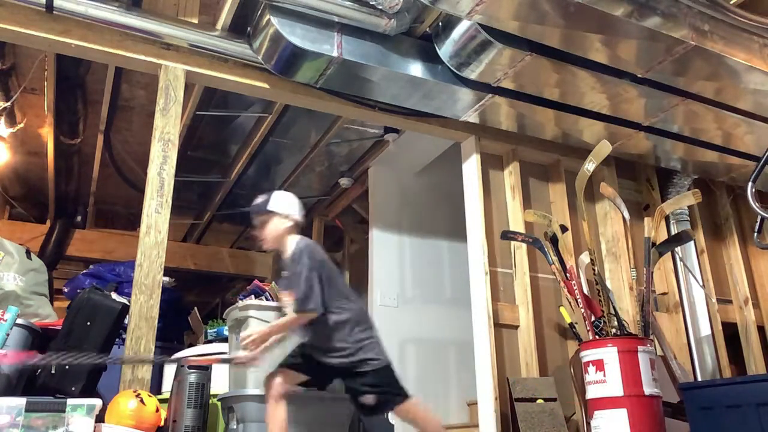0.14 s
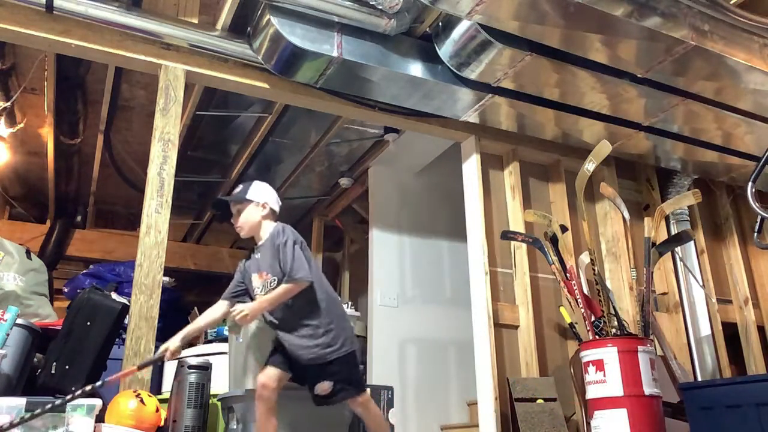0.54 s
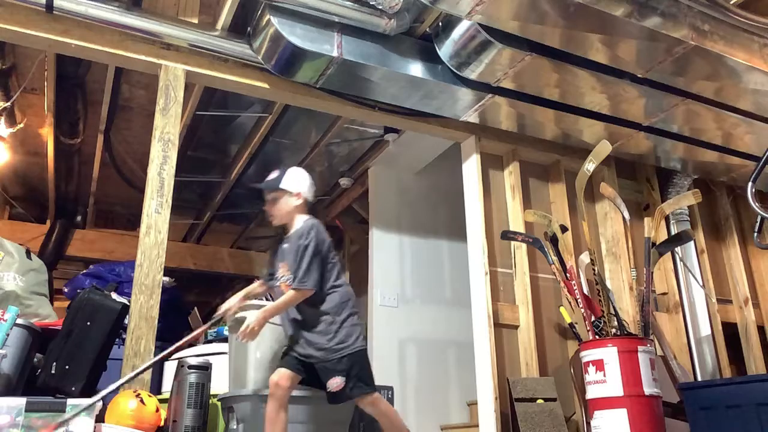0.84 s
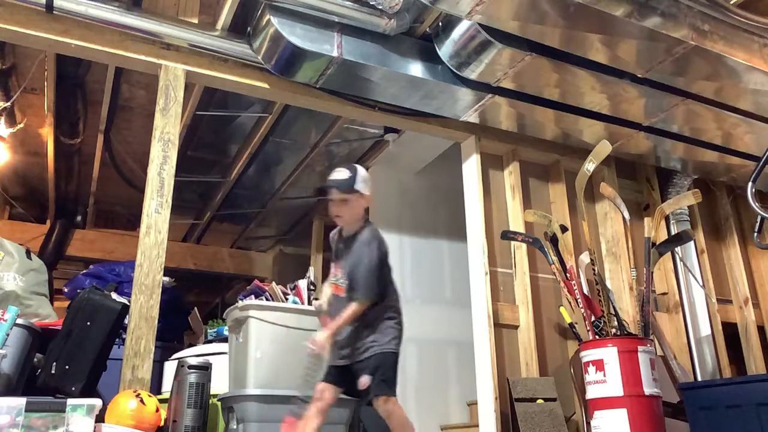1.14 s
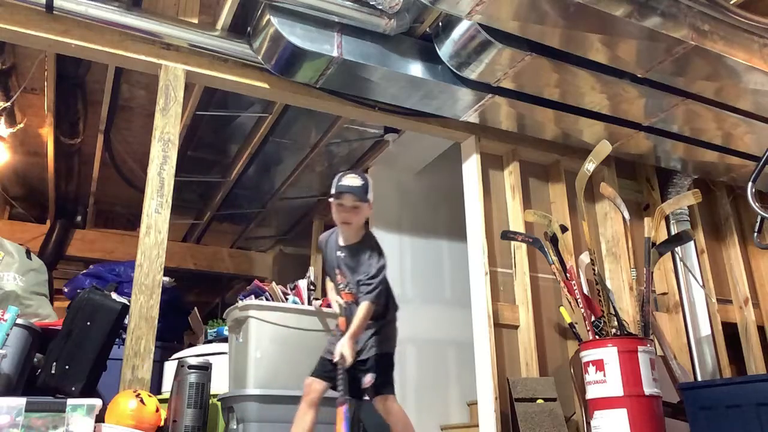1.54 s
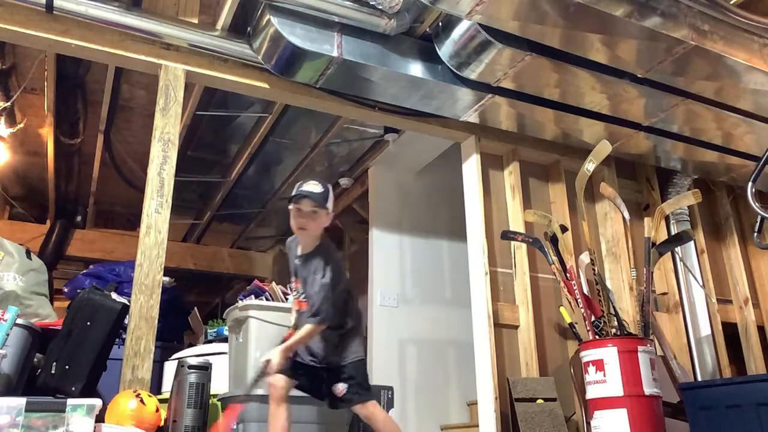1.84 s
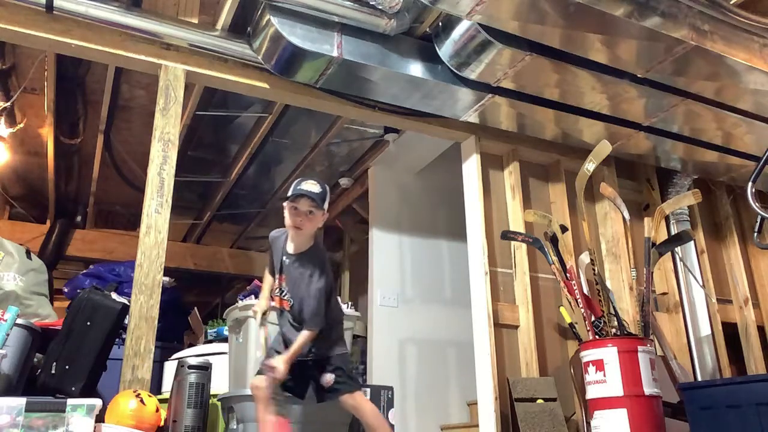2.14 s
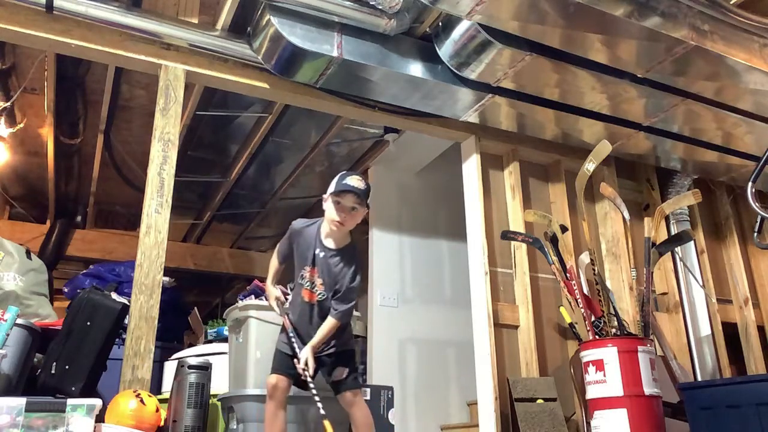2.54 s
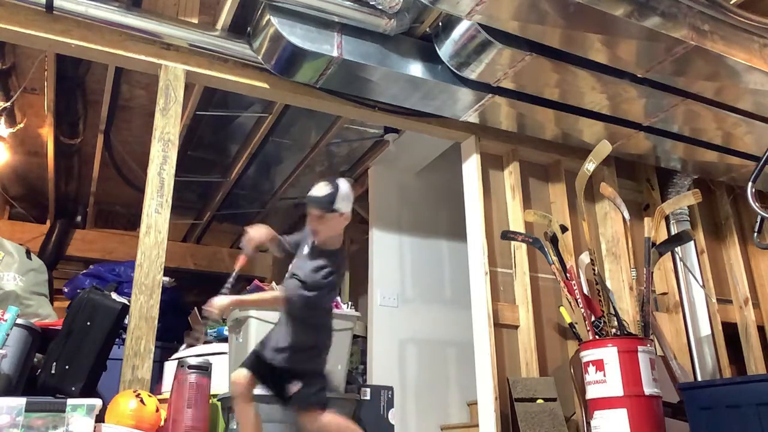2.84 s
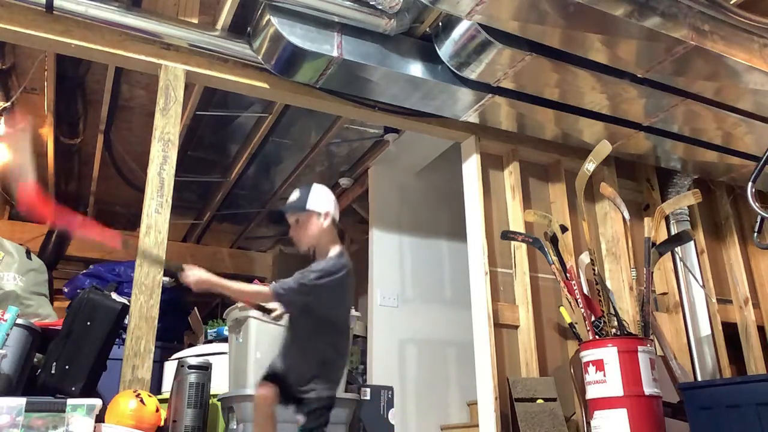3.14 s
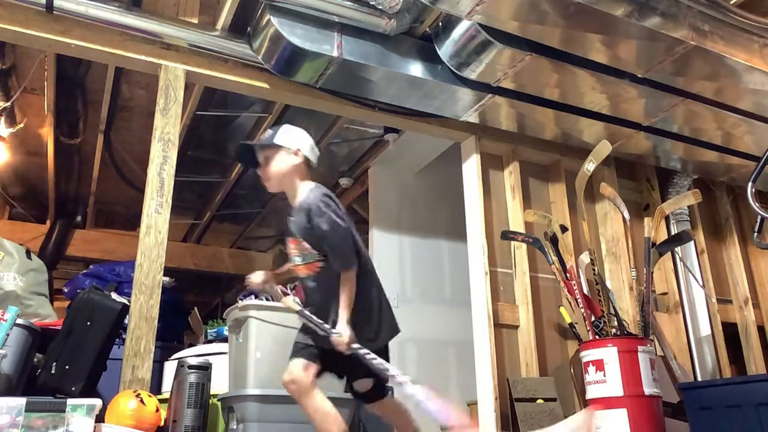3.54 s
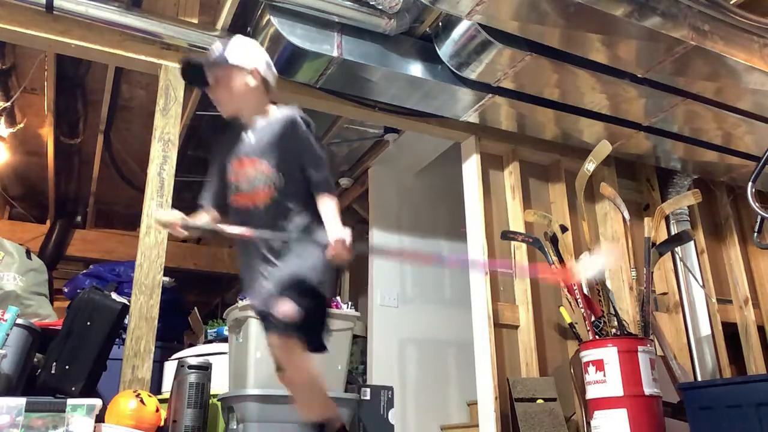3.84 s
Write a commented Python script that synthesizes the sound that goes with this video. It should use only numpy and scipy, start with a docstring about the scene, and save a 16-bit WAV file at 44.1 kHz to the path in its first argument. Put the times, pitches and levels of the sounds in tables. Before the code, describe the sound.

Hockey stick blade knocks a puck on a hard garage floor, then a shot crashes into metal

```python
"""Stick and puck in a bare garage

A child handles a puck with a hockey stick on a hard floor: the blade clacks as clicks with noisy chatter and ringing modes.
Gritty noise scrapes between touches and sweeps into a shot, whose noise crashes ring and rattle metal modes.
Low noise bursts are the thuds of feet, shaped noise and a sine are the air and its faint hum.
A muffled direct path and a dense random tail give reverberation to all but the background, which stays dry."""
import sys
import numpy as np
from scipy import signal
from scipy.io import wavfile
from scipy.ndimage import uniform_filter1d

SR = 44100
rng = np.random.default_rng(int(sys.argv[2]) if len(sys.argv) > 2 else 0)


def unload_audio(sound):
    """Save the sound as a 16-bit wav file, at the path given as the first command line argument."""
    columns = np.transpose(np.atleast_2d(sound))
    # keep every value between -1 and 1, then stretch to whole-number steps
    steps = np.round(np.clip(columns, -1, 1) * 32767)
    wavfile.write(sys.argv[1], SR, steps.astype(np.int16))


N = 176400


def amp(db):
    """Decibels to gain."""
    return 10 ** (np.asarray(db) / 20)


def unit(x):
    """Scales a sound to energy 1."""
    return x / np.sqrt(np.sum(x ** 2) + 1e-20)


def read(points, hz):
    """Reads a (Hz, value) table on a log-frequency axis."""
    f, value = np.transpose(points)
    return np.interp(np.log(hz + 1), np.log(f), value)


def add(mix, s, sound):
    """Mixes a sound in at a time in seconds, cut at the end of the mix."""
    part = mix[max(round(s * SR), 0):][:len(sound)]
    part += sound[:len(part)]


def colour(x, *tables, size=4096):
    """Minimum-phase filter from the sum of (Hz, dB) tables, so that no sound precedes its cause."""
    hz = abs(np.fft.fftfreq(size, 1 / SR))
    total_db = sum(read(table, hz) for table in tables)
    log_gain = np.log(amp(total_db))
    spectrum = np.exp(np.conj(signal.hilbert(log_gain)))
    taps = np.fft.ifft(spectrum).real[:size // 2]
    return signal.fftconvolve(x, taps)[:len(x)]


def ring(modes, t):
    """Resonant modes as dying sines of random phase, each with the energy of its dB value."""
    out = np.zeros(len(t))
    for hz, db, t60_s in modes:
        u = t[t < t60_s]
        decay = np.exp(-np.log(1000) * u / t60_s)
        tone = np.sin(2 * np.pi * (hz * u + rng.random()))
        add(out, 0, amp(db) * unit(decay * tone))
    return out


def room(x, room_db=0):
    """Muffled straight path, a cluster of ceiling reflections and a random tail that dies band by band."""
    # reverberation time: frequency_hz, t60_s
    reverb_t60 = [(100, 0.5), (260, 1.1), (700, 1.34), (1840, 0.98), (4850, 0.8738), (7000, 0.7248),
                  (10000, 0.6), (15000, .3)]
    # muffling of the straight path: frequency_hz, gain_db
    direct_colour = [(100, -11.5), (1000, -2), (3000, -5.5), (6000, -11), (9000, -13), (16000, -27)]
    base_db, near_db, near_decay_s = -0.5, 7.5, 0.071
    early_db, early_s, early_width_s = 9, 0.015, 0.0029
    reflections_per_s, onset_s = 5000, 0.0028
    t = np.arange(SR * 3 // 4) / SR
    # every call draws new reflections
    taps = rng.choice([-1., 1.], len(t)) * (rng.random(len(t)) < reflections_per_s / SR)
    near = amp(near_db) * np.exp(-t / near_decay_s)
    early = amp(early_db) * np.exp(-((t - early_s) / early_width_s) ** 2)
    taps *= np.minimum(t / onset_s, 1) * (1 + near + early)
    # the decay is applied to each band of the spectrogram
    hz, at_s, z = signal.stft(taps, SR, nperseg=256)
    decay = amp(-60 * at_s / read(reverb_t60, hz)[:, None])
    tail = signal.istft(z * decay, SR, nperseg=256)[1]
    reflected = signal.fftconvolve(x, unit(tail))[:len(x)]
    return colour(x, direct_colour) + amp(base_db + room_db) * reflected


def background():
    """Still room air as steady coloured noise, with a faint mains hum as one sine."""
    # spectrum of the air, relative: frequency_hz, density_db (per Hz)
    air_colour = [(15, -56), (25, -68), (55, -1), (120, -8.5), (190, -6.5), (263, -5.5), (451, -12.5),
                  (531, -11), (1370, -25.5), (3250, -24.5), (3620, -25.5), (6560, -18), (16000, -50)]
    air_db, hum_db, hum_hz = -52, -59.5, 120  # RMS levels
    air = unit(colour(rng.standard_normal(N), air_colour)) * np.sqrt(N)
    hum = np.sqrt(2) * np.sin(2 * np.pi * hum_hz * np.arange(N) / SR)
    return amp(air_db) * air + amp(hum_db) * hum


def thumps():
    """Footfalls and dull thumps: soft, low blows on the floor as short decaying noise."""
    # blows: start_s, relative_level_db
    blows = [(0.023, 3), (.055, -8), (3.041, -1), (3.225, 8), (3.317, -20), (3.482, 9.5), (3.556, 5),
             (3.6, -4), (3.709, 2.5)]
    # dull spectrum of a blow: frequency_hz, gain_db
    thump_colour = [(30, -25), (60, 2), (160, -0.5), (300, -15), (700, -34), (2000, -35), (16000, -63)]
    base_db, decay_s = 3.5, 0.01
    out, t = np.zeros(N), np.arange(SR // 4) / SR
    for s, db in blows:
        burst = unit(rng.standard_normal(len(t)) * np.exp(-t / decay_s))
        add(out, s, amp(base_db + db) * colour(burst, thump_colour))
    return out


def scrapes():
    """Blade and shoes drag over the floor: dense grit under a stroke that swells and lifts off."""
    # strokes: start_s, rise_s, release_s, level_db, body_db (tilts low mids against treble)
    strokes = [(.06, 0.11, 0.13, -46, -8.5), (0.581, 0.03, 0.063, -43, 0), (.65, 0.043, 0.18, -35, 0.5),
               (.79, 0.033, 0.082, -40, -6), (.97, 0.019, 0.41, -49, -5), (1.561, 0.17, 0.049, -34, -1.5),
               (2.531, 0.13, 0.26, -36, -4), (2.77, 0.068, 0.05, -27.5, -3.5),
               (2.86, 0.054, 0.048, -37, -3), (3.196, 0.029, 0.011, -21.5, 5.5),
               (3.39, 0.096, 0.12, -34.5, 7), (3.85, 0.061, 0.38, -45.5, -9.5)]
    # spectrum of the grit: frequency_hz, gain_db
    scrape_colour = [(60, -38), (250, -6), (600, -5), (1200, -8.5), (2500, -3.5), (5000, -1.5), (6800, 4),
                     (8000, -2), (10500, -10.5), (16000, -18)]
    grains_per_s, grain_db = 1200, 5
    out = np.zeros(N)
    for s, rise_s, release_s, db, body_db in strokes:
        t = np.arange(0, rise_s + release_s, 1 / SR)
        sign, size, chance = rng.standard_normal(SR), rng.exponential(1, SR), rng.random(SR)
        # sparse larger grains stand out of fine noise
        grains = amp(grain_db * np.minimum(size, 4)) * (chance < grains_per_s / SR)
        grit = sign * (.5 + grains)
        tilt = [(1500, body_db), (6500, 0), (12000, -.9 * body_db)]
        hiss = unit(colour(grit, scrape_colour, tilt)) * np.sqrt(SR)
        swell = np.interp(t, [0, rise_s, rise_s + release_s], [0, 1, 0])
        stroke = np.sin(np.pi / 2 * swell) ** 2
        add(out, s, amp(db) * stroke * hiss[:len(t)])
    return out


def shot():
    """The puck crashes into metal as noise bursts; the metal's modes ring on and rattle."""
    # two crashes in quick succession: start_s, relative_level_db
    crashes = [(3.2162, 3), (3.2285, -8.5)]
    # spectrum of a crash: frequency_hz, gain_db
    crash_colour = [(40, -13), (110, -12), (210, 1), (330, -31), (500, -13), (1100, -14.5), (2400, -4.5),
                    (4500, -4.5), (6400, 8), (7500, 1), (9000, -10), (16000, -24)]
    # modes of the struck metal: frequency_hz, relative_level_db, t60_s
    metal_modes = [(2261, 6, 0.52), (2455, 6, 0.3), (3440, -2.5, 0.35), (4850, -21, 0.28), (5650, -12, .3),
                   (6100, 10, 0.18), (6100, 5, 0.38), (6345, 2, .7), (6700, 7, 0.36), (6717, 4, 0.46),
                   (6960, 1, .4), (7376, 1, .4)]
    crash_db, rise_s, decay_s, crash_room_db = 26.5, 0.0041, 0.003, -3.5
    metal_db, metal_room_db = 13.5, -11
    # the shaking peaks at a time in the scene
    shake_s, shake_width_s, shakes_per_s, shake_db = 3.45, 0.084, 150, 5
    out, t = np.zeros(N), np.arange(SR) / SR
    for s, db in crashes:
        crash = rng.standard_normal(SR) * np.minimum(t / rise_s, 1) ** 2 * np.exp(-t / decay_s)
        add(out, s, amp(crash_db + db) * room(colour(unit(crash), crash_colour), crash_room_db))
    struck_s = crashes[0][0] + rise_s
    metal = unit(ring(metal_modes, t))
    # small random blows, strongest around shake_s, excite the same modes again
    blows = rng.standard_normal(SR) * (rng.random(SR) < shakes_per_s / SR)
    rattle = blows * np.exp(-((t + struck_s - shake_s) / shake_width_s) ** 2)
    shaken = signal.fftconvolve(rattle, metal)[:SR]
    add(out, struck_s, room(amp(metal_db) * metal + amp(shake_db) * unit(shaken), metal_room_db))
    return out


def knocks():
    """Click, chatter and blade modes favoured near each blow's ring centre; reflections drawn at random."""
    # touches, levels relative: start_s, level_db, chatter_decay_s, bass_db, body_db, treble_db,
    # blade_ring_db, ring_centre_hz, room_db
    touches = [(0.4038, -8, 0.0049, 8, 2.5, -2.5, 2.5, 1870, 1.5),
               (0.4128, -4, 0.0025, -6, -2, -8.5, 0, 4530, 0),
               (.7180, -11.5, 0.0055, 12, 11, -3.5, 3, 1780, -1),
               (0.735, -16, 0.0016, -8, 9, 0, 3, 1680, -6), (.7440, -19, 0.0014, 12, 4, 2, -20, 1700, -3.5),
               (0.8263, -14.5, 0.00079, 1, 0.5, -14.5, -28, 1700, 1),
               (.8500, -20, 0.0028, 17, 8, 1, -16, 1700, -6),
               (0.8943, -24.5, 0.001, -6, -24, 5.5, -23, 2980, -8),
               (.9095, -25, .004, 0, -15, 17.5, 1, 2900, -9.5),
               (1.008, -39, 0.0042, -29, -4, 23, -33, 2900, -14),
               (1.064, -25.5, .0015, 10, -15, -7, -10, 2950, -1),
               (1.0765, -26, 0.0019, -7, -6, 3, 3, 2930, -8.5), (1.19, 2, 0.0055, -2.5, 1, 0, -5, 2380, -4),
               (1.2040, -3.5, 0.0016, -4, -10, 2, -2, 2800, 0),
               (1.7554, -11.5, 0.00054, 12, 8.5, 4, -5, 3000, -3),
               (1.9948, 2.5, 0.015, 1, 9, 3, -4, 2420, -8.5),
               (2.0120, 0, 0.0029, -5, -14, 2.5, -2, 6650, -7),
               (2.0451, -12.5, 0.00021, 5, -12, 4, -19, 4000, -3),
               (2.0580, -16.5, 0.0028, 19, 16, 24.5, 5, 5800, -33),
               (2.0630, -15, 0.004, 19.5, -12, 22.5, 12.5, 6250, -16.5),
               (2.2231, -10.5, 0.0023, 19, -4, 9.5, -1.5, 2840, 1.5),
               (2.2256, 2, 0.0056, 9, 2.5, -0.5, -33, 3350, -2.5),
               (2.7440, -26, 0.0013, 8, 10, -0.5, -9, 2970, 2.5),
               (3.167, -31.5, 0.0037, 13, 14, 1, -5, 2000, 1.5),
               (3.1790, -27.5, 0.004, 17.5, -5, 6, 4, 1930, 0.5),
               (3.6650, -29, .002, 8, 0, 3.5, -15, 2500, 0), (3.6731, -25, 0.0016, 5, 2, -24, -15, 2620, 2),
               (3.8735, -34.5, 0.0014, 0, 9.5, -15, -14, 2530, 5.5),
               (3.889, -39.5, 0.0024, 23, -8, 11.5, -11, 2500, -11)]
    # spectrum of a knock: frequency_hz, gain_db
    knock_colour = [(50, -49), (140, -11.5), (300, -11.5), (700, -9), (1100, -8.5), (1700, -1.5),
                    (2800, -0.5), (4500, -3), (6800, 0), (8500, -10.5), (11000, -17.5), (16000, -31)]
    # modes of the blade: frequency_hz, relative_level_db, t60_s
    blade_modes = [(1280, -4.5, 0.17), (1596, -2.5, 0.059), (1760, -5.5, 0.023), (2066, -2, 0.12),
                   (2538, -1.5, 0.059), (2830, -14, 0.19), (2960, -5, .12), (3660, -11, 0.042),
                   (4060, -3.5, 0.074), (4506, -4, 0.02), (5750, 0, 0.1), (6520, 4, 0.02),
                   (6730, -16, 0.066)]
    base_db, ring_base_db, ring_width_octaves = 25.5, -10, 0.26
    chatter_base_db, chatter_reference_s = 5, 0.0029  # longer chatter is stronger against the click
    out, t = np.zeros(N), np.arange(SR * 3 // 4) / SR
    for s, db, chatter_s, bass_db, body_db, treble_db, ring_db, centre_hz, room_db in touches:
        chatter = unit(rng.standard_normal(len(t)) * np.exp(-t / chatter_s))
        contact = amp(chatter_base_db) * chatter_s / chatter_reference_s * chatter
        contact[0] += 1  # the click
        tone = [(190, 0.0092), (340, bass_db), (750, body_db), (2000, 0), (5500, treble_db)]
        crack = colour(unit(contact), knock_colour, tone)
        # modes away from the centre are weaker, by 14 dB at most
        modes = []
        for hz, mode_db, t60_s in blade_modes:
            distance = abs(np.log2(hz / centre_hz)) / ring_width_octaves
            modes.append((hz, mode_db - 7 * min(distance, 2), t60_s))
        blade = amp(ring_base_db + ring_db) * ring(modes, t)
        add(out, s, amp(base_db + db) * room(crack + blade, room_db))
    return out


def scene():
    """Scrapes and thumps share one reverberant tail; knocks and shot have their own; background stays dry."""
    moves = room(scrapes() + thumps())
    return (knocks() + shot() + moves + background())[None]


def record(dry):
    """Low cut, quick 2:1 compression of peaks, soft overload and a band limit."""
    low_cut_hz, edge_hz, clip_level = 59, 15900, .85
    threshold_db, detector_fall_db_per_s = -1, 138
    low_cut = signal.butter(N=4, Wn=low_cut_hz, btype="high", fs=SR, output="sos")
    dry = signal.sosfilt(low_cut, dry)
    level_db = 20 * np.log10(abs(dry[0]) + 1e-9)
    # peak detector: jumps up at once, falls at a steady rate
    fall_db = np.arange(N) * detector_fall_db_per_s / SR
    peak_db = np.maximum.accumulate(level_db + fall_db) - fall_db
    over_db = np.maximum(peak_db - threshold_db, 0)
    held = dry * amp(-.5 * uniform_filter1d(over_db, size=64))
    held = held / (1 + (held / clip_level) ** 6) ** (1 / 6)
    band_limit = signal.firwin(511, edge_hz, window=("kaiser", 9), fs=SR)
    return signal.oaconvolve(held, band_limit[None], "same")


dry = scene()
out = record(dry)
unload_audio(out)
```